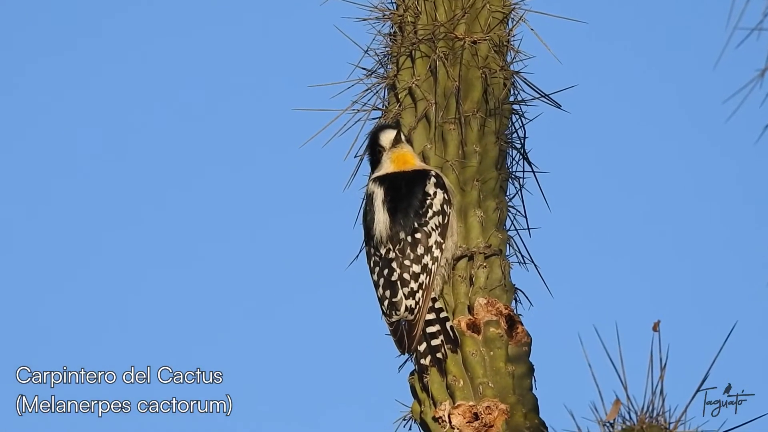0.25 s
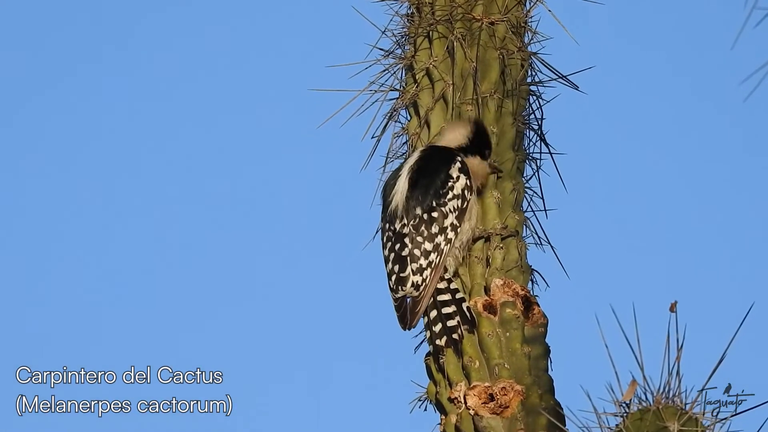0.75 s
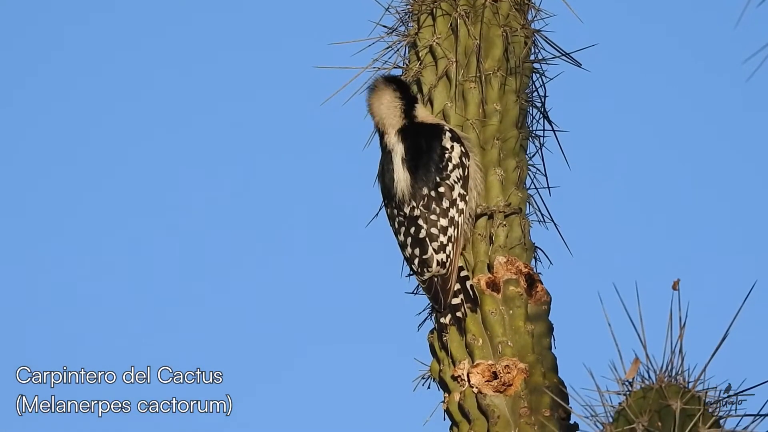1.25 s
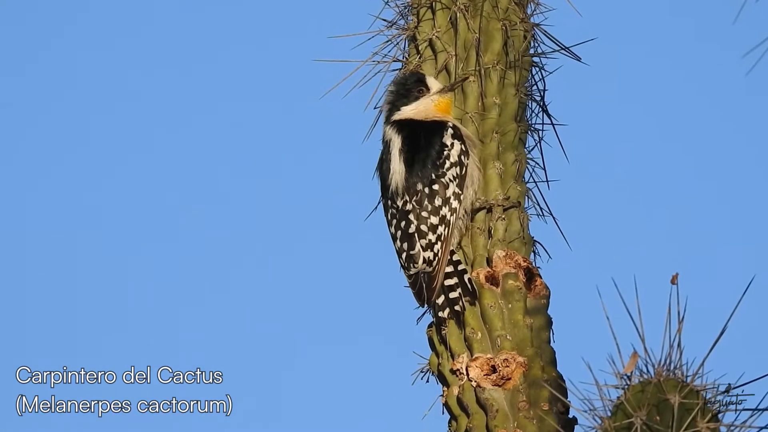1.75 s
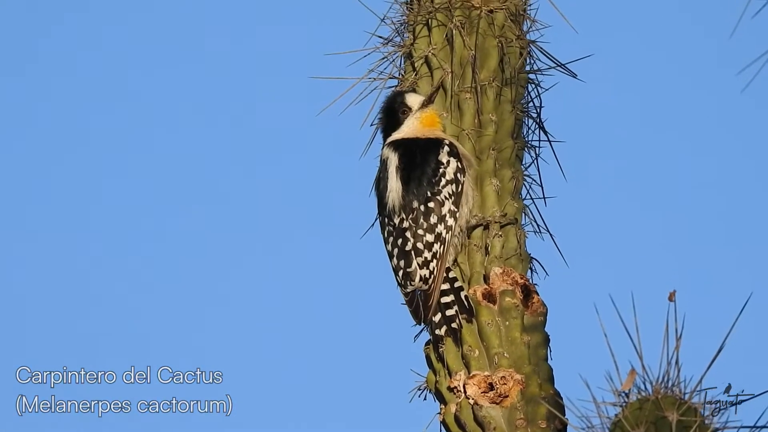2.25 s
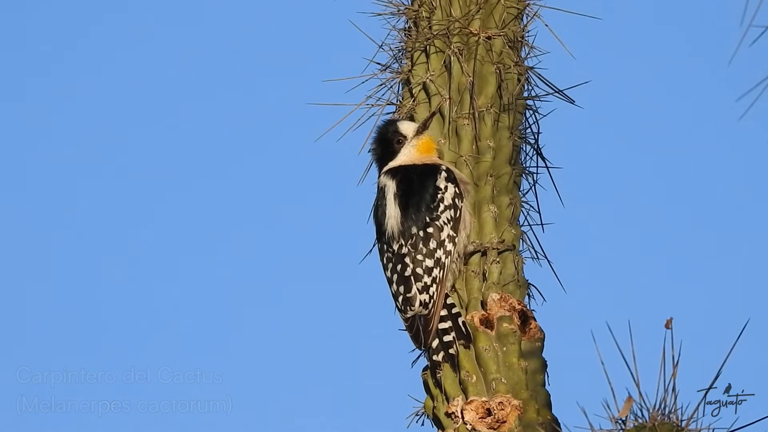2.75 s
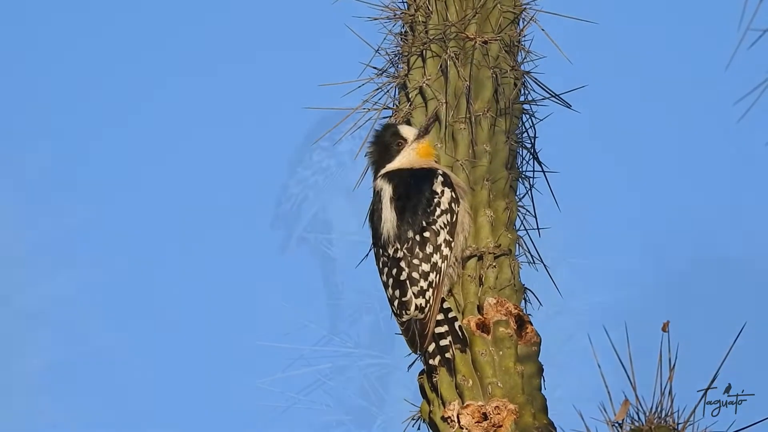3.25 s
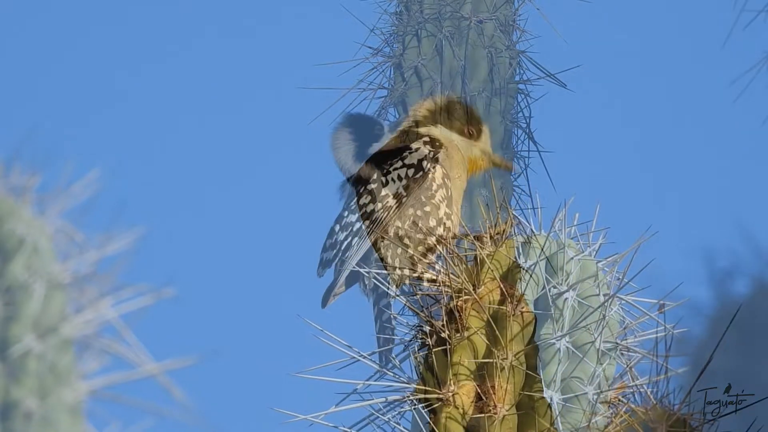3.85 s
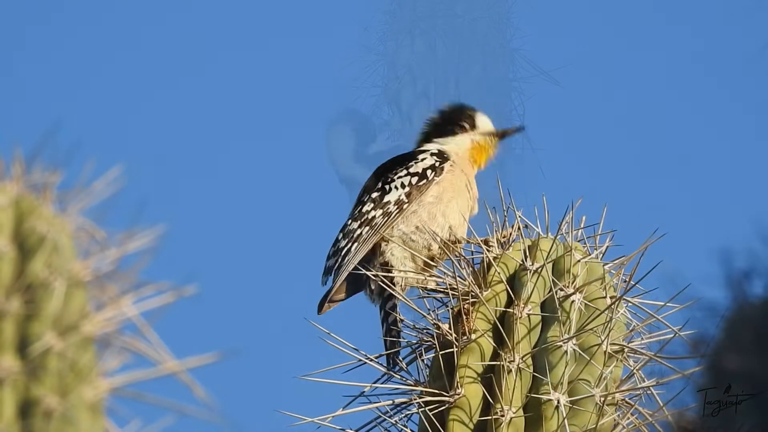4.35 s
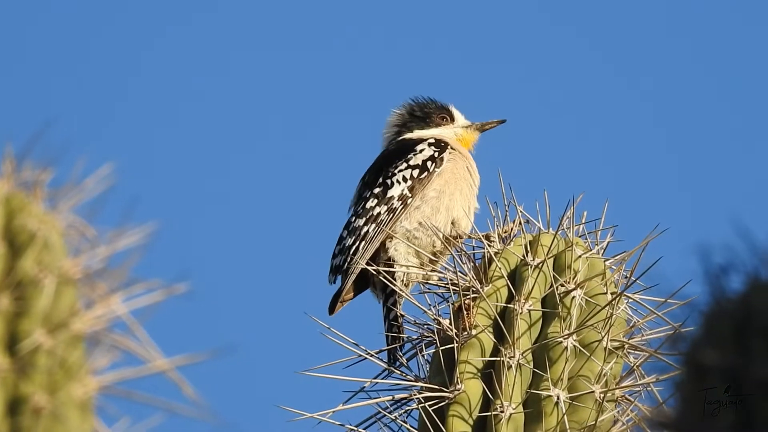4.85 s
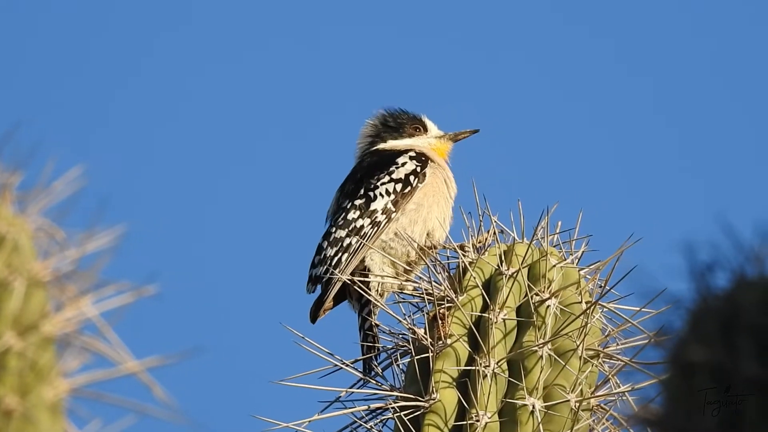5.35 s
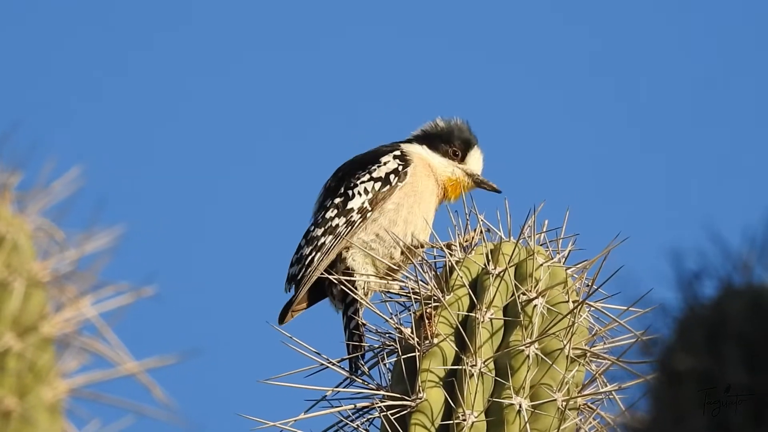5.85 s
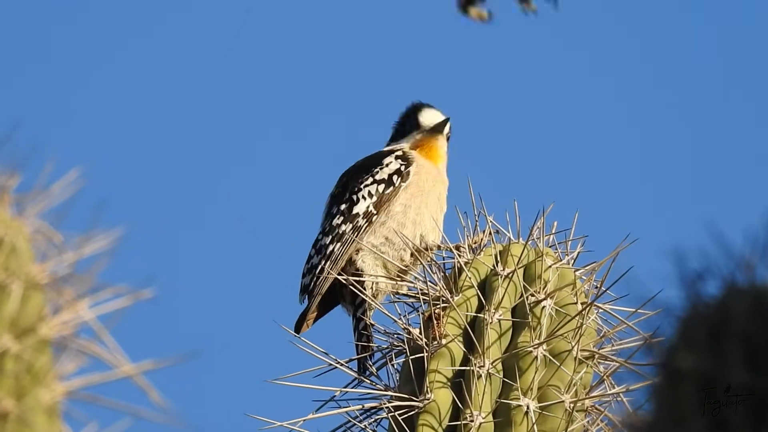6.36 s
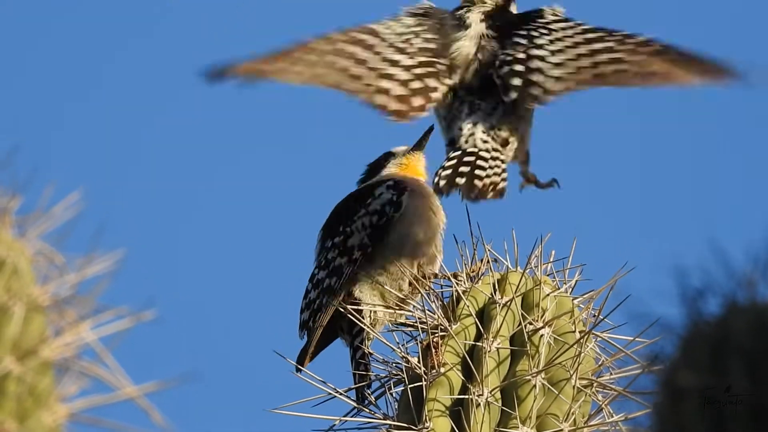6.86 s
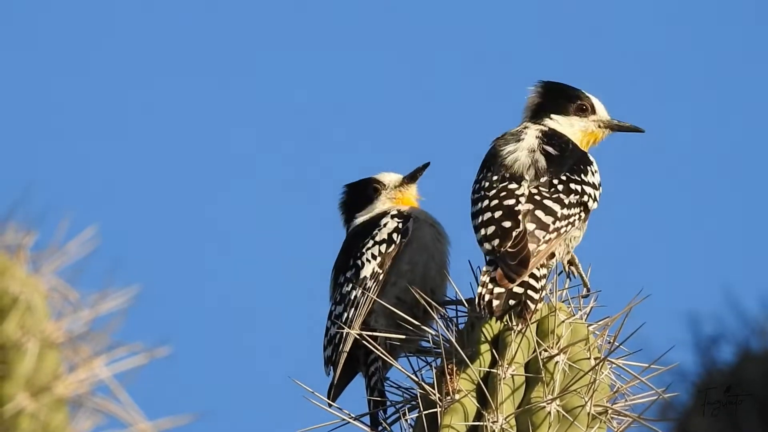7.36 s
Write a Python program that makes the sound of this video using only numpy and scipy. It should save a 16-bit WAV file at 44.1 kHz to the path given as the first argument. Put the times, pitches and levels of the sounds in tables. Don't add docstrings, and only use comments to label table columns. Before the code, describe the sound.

Woodpeckers chatter in sharp, falling, trembling calls outdoors; from about two and a half seconds a closer bird adds harsh, raspy squawks over faint hum.

```python
import sys
import numpy as np
from scipy import signal
from scipy.fft import rfft, irfft
from scipy.io import wavfile
from scipy.ndimage import uniform_filter1d

SR = 44100
rng = np.random.default_rng(int(sys.argv[2]) if len(sys.argv) > 2 else 0)


def volts_from_db(level):
    exponent = np.asarray(level, float) / 20
    return 10 ** exponent


def generate_wav(sig):
    pcm = np.round(np.clip(np.atleast_2d(sig).T, -1, 1) * 32767).astype(np.int16)
    wavfile.write(sys.argv[1], SR, pcm)


N = 336042


def evened(x):
    return x / np.sqrt(np.mean(x ** 2) + 1e-20)


def read(points, at):
    return np.interp(at, *np.transpose(points))


def colour(points, hz):
    f, db = np.transpose(points)
    return volts_from_db(np.interp(np.log(hz + 1), np.log(f + 1), db))


def ramp(t, start, length):
    return np.clip((t - start) / length, 0, 1)


def add(mix, start_s, sound):
    part = mix[max(round(start_s * SR), 0):][:len(sound)]
    part += sound[:len(part)]


def layer(calls):
    mix = np.zeros(N)
    for start_s, sound in calls:
        add(mix, start_s, sound)
    return mix


def wobble(n, hz):
    size = max(int(SR / hz), 2)
    noise = rng.standard_normal(n + 2 * size)
    smooth = uniform_filter1d(uniform_filter1d(noise, size), size)
    return evened(smooth)[size:size + n]


def voice(hz, gains, jitter, flutter, count):
    turns = np.cumsum(hz * (1 + jitter * wobble(len(hz), 900))) / SR + rng.random()
    tone = np.zeros(len(hz))
    for k in range(1, count + 1):
        audible = k * hz < SR / 2.5
        fluttering = 1 + flutter * wobble(len(hz), 350)
        tone += gains(k, k * hz) * audible * fluttering * np.sin(2 * np.pi * k * turns)
    return tone


def played(rows):
    s, hz, db = np.transpose(rows)
    t = np.arange(s[0], s[-1], 1 / SR)
    gain = np.sqrt(2) * volts_from_db(np.interp(t, s, db)) * signal.windows.tukey(len(t), .06)
    return s[0], np.interp(t, s, hz), gain


def scrub(x, t60, level_db):
    at = np.arange(150, SR // 2, 22)
    taps = np.zeros(SR // 2 + 22)
    signs = rng.choice([-1., 1.], len(at))
    taps[at + rng.integers(0, 22, len(at))] = signs * volts_from_db(-60 * at / SR / t60)
    return x + volts_from_db(level_db) * signal.fftconvolve(x, taps / np.linalg.norm(taps))[:len(x)]


# pitch_hz, level_db
HISS = [(1500, -30), (3000, -1), (5500, -4), (9000, -16.5), (15000, -40)]


def hiss(n, dull_db):
    hz = np.fft.rfftfreq(n, 1 / SR)
    spectrum = rfft(rng.standard_normal(n)) * colour(HISS, hz) * volts_from_db(dull_db * hz / 1000)
    return evened(irfft(spectrum, n))


# after_snap_s, pitch_hz
SQUAWK_FALL = [(-.004, 2200), (0, 2010), (.004, 1900), (.0162, 1800), (.0178, 1710), (.0265, 1490),
               (.0285, 1400), (.04, 1120)]
# after_snap_s, level_db
SQUAWK_EFFORT = [(0, -5), (.003, -.5), (.014, -2), (.017, -10), (.0195, -3), (.024, -6), (.0275, -19),
                 (.0305, -9), (.036, -13), (.04, -36)]
STEP_PARTIALS_DB = [(-6.5, 1.4, 0, -2.5, 0.5, 1, -13, -1), (-3, 2, -7.5, -4.5, 0, 0, -3, -12),
                    (-8.5, 1.5, 1.5, -2, -8, 3, -7, -14)]
# pitch_hz, level_db
BEAK = [(900, -16), (1500, -5.5), (2300, -10.5), (3100, -1), (3800, -1.5), (4600, 0.5), (5400, -6),
        (7500, -21), (10000, -30), (15000, -118)]
# pitch_hz, level_db
BROKEN_THROAT = [(1500, -86), (2300, -14), (3100, -12.5), (3850, 6), (4600, -22), (5400, -15),
                 (6200, -18.5), (9500, -36.5)]
USUAL_SLIP_S = .017


def squawk(snap, db, lead, pitch, slip, broken):
    t = np.arange(-lead, slip + SQUAWK_FALL[-1][0] - USUAL_SLIP_S, 1 / SR)
    until_slip = np.where(t < slip, t * USUAL_SLIP_S / slip, t - slip + USUAL_SLIP_S)
    u = np.where(t < 0, t, until_slip)
    opened = ramp(t, -.004, .004)
    clear = opened * ramp(t, slip - .00041, .00041) if broken else opened
    tune, climb, ring = rng.uniform([.985, -.4, -.01], [1.03, .9, .07])
    rasp = hiss(len(t), -0.98) * (1 + 0.5 * wobble(len(t), 214))

    dip = .14 * (not broken) * ramp(t, -.01, .01)
    held_hz = 2341 * tune * (1 + climb * (t + lead / 2) - dip)
    held = voice(held_hz, lambda k, hz: volts_from_db(-15.0 * (k - 1)), .015, .3, count=4)
    mutter = voice(rng.uniform(3700, 4400) + 0 * t, lambda k, hz: 1, .035, .7, count=1)
    swell = (1 - opened) * ramp(t, -lead, .008) * volts_from_db(200 * t - 2.5)
    chirp = np.sin(2 * np.pi * np.cumsum(3000 + 40000 * (t + .005)) / SR)
    crack = (.7 if broken else .35) * np.exp(-((t + .005) / .0025) ** 2) * chirp
    lead_in = swell * (held + volts_from_db(-8.5) * rasp + volts_from_db(-8.5) * mutter) + crack
    lead_db = -6.5 - (1 - 0.031) * np.clip(db + 28.5, -4, 4)

    closing = 0.963 + 0.23 * ramp(t, 0, slip) ** 2
    slow_hz = 756.4 * (1 + ring / 4 - .6 * t)
    slow = voice(slow_hz, lambda k, hz: colour(BROKEN_THROAT, hz * closing), .009, .18, count=13)
    burst_db = -1.0 - 9 * np.clip(-t / .002, 0, 1) - 3 * ramp(t, .012, .0034)
    pulsing = volts_from_db(burst_db) * slow + volts_from_db(-17.5) * rasp

    turned_db = STEP_PARTIALS_DB + rng.uniform(-2.5, 2.5, (3, 8)) - broken * 1.6 * np.arange(8)

    def beak_gain(k, hz):
        step_db = np.interp(u, [.016, .018, .0265, .0285], turned_db[[0, 1, 1, 2], k - 1])
        return colour(BEAK, hz) * volts_from_db(step_db)

    fall = voice(pitch * read(SQUAWK_FALL, u), beak_gain, .007, .2, count=8)
    body = (opened - clear) * pulsing + clear * (fall + volts_from_db(-20.0) * rasp)
    return snap - lead, volts_from_db(db) * (volts_from_db(lead_db) * lead_in + volts_from_db(read(SQUAWK_EFFORT, u)) * body)


# snap_s, level_db, lead_in_s, pitch_factor, broken_hold_s
CRACKED_SQUAWKS = [(2.487, -28.5, 0.045, 0.94, 0.016), (2.626, -29.5, 0.039, 0.92, 0.02),
                   (2.776, -28.5, 0.044, 0.97, 0.014), (2.8942, -29, 0.038, 0.96, 0.022),
                   (3.2763, -29, 0.041, 0.96, 0.017), (3.896, -29.5, 0.042, 0.93, 0.02),
                   (4.13, -31, 0.047, 0.94, 0.014), (5.798, -29.5, .04, 1.01, 0.016),
                   (6.5084, -29.5, 0.043, 0.96, 0.018), (6.819, -28.5, 0.048, 0.95, 0.012),
                   (7.5906, -30, 0.04, 0.94, 0.016)]
# snap_s, level_db, lead_in_s, pitch_factor, first_slip_s
CLEAR_SQUAWKS = [(3.0406, -30.5, 0.037, 1.01, 0.015), (3.4115, -30.5, 0.039, 0.93, 0.019),
                 (3.768, -28.5, 0.039, 0.98, 0.018), (4.2524, -30, 0.044, 1, 0.019),
                 (4.387, -31, 0.035, 0.98, 0.017), (4.721, -28.5, 0.035, 0.96, 0.017),
                 (4.8762, -30.5, 0.037, 0.94, .017), (5.149, -37, 0.012, 0.87, 0.017),
                 (5.333, -37.5, 0.031, .86, .015), (5.5253, -30, 0.044, 0.91, 0.018),
                 (6.6652, -29.5, 0.049, 0.93, 0.018), (7.1717, -28.5, 0.042, 0.95, 0.013)]


def near_squawks():
    cracked = layer(squawk(*row, broken=True) for row in CRACKED_SQUAWKS)
    return cracked + layer(squawk(*row, broken=False) for row in CLEAR_SQUAWKS)


ANSWER_DROP = [(0, 1.03), (.12, 0.98), (.22, 0.93), (.4, .86), (1, 0.83)]
# share_of_note, level_db
ANSWER_EFFORT = [(0, -3.5), (.05, -1.5), (.11, -2), (.14, -4), (.4, -12), (.85, -16), (1, -19)]


def answer(s, db, hz, length, depth, first_db):
    share = np.linspace(0, 1, round(length * SR))
    partial_db = [first_db + 5.6 * share - 0.25 * (db + 38), -4.0 * share]
    partial_db += [top_db - 1.7 * share for top_db in (-23.0, -29.0, -35.5, -35)]
    grain = np.clip(share / 0.21, 0, 1)

    def grainy(k, f):
        return volts_from_db(partial_db[k - 1]) * (1 + .55 * grain * min(k - .35, 1) * wobble(len(f), 350))

    pitch = hz / 2 * read(ANSWER_DROP, share) ** depth
    tone = voice(pitch, grainy, .004 + .012 * grain, .1, count=6)
    tone += volts_from_db(-20.5) * hiss(len(share), .1)
    return s, volts_from_db(db + read(ANSWER_EFFORT, share)) * tone * np.clip(share / .018, 0, 1) ** 2


# start_s, level_db, second_partial_hz, length_s
ANSWERS = [(.0, -36, 4725, 0.048), (0.174, -35, 4686, 0.083), (0.357, -35, 4890, 0.083),
           (0.562, -39, 4790, 0.078), (0.74, -36.5, 4857, 0.074), (0.9412, -36, 4920, 0.073),
           (1.1083, -34.5, 5120, 0.069), (1.2706, -34.5, 4980, 0.087), (1.456, -35.5, 4817, 0.099),
           (1.642, -37.5, 4970, 0.09), (1.885, -38, 4960, 0.053), (2.0105, -34, 4910, 0.073),
           (2.191, -37, 4890, 0.056), (2.358, -38, 4890, 0.066), (4.207, -38, 4860, 0.092),
           (4.541, -35, 4940, 0.07), (4.694, -35.5, 4787, 0.08), (4.826, -34.5, 4920, 0.072),
           (4.978, -35.5, 4905, 0.078), (5.134, -35, 4980, 0.093), (5.2942, -33.5, 4860, 0.048),
           (5.472, -38.5, 4603, 0.13), (5.642, -35.5, 4750, 0.1), (5.819, -35, 4930, 0.086),
           (6.077, -40, 4980, 0.077), (6.223, -41.5, 4670, 0.084), (6.373, -41.5, 4910, 0.066),
           (7.0934, -37.5, 4860, 0.096), (7.289, -37, 4848, 0.061), (7.469, -38, 4816, 0.091)]
# start_s, level_db, second_partial_hz, length_s, fall_depth
CUT_INS = [(1.017, -44.5, 5580, .08, 2.4), (1.198, -41, 4990, .085, 1.1), (1.338, -43.5, 4930, 0.13, 0.97),
           (1.61, -43, 4870, 0.1, 1.14), (1.739, -42.5, 4790, .07, .6), (1.839, -39, 4670, 0.081, 0.94),
           (2.151, -44, 5200, .06, 1.3), (2.523, -40, 5040, 0.1, 0.98), (2.735, -41.5, 5240, 0.069, 0.46),
           (5.943, -44, 4625, 0.06, 1.03)]


def answering_mates():
    steady = layer(answer(*row, 1.0, first_db=-9.5) for row in ANSWERS)
    return steady + layer(answer(*row, first_db=-8.5) for row in CUT_INS)


# after_start_s, pitch_hz
ARCH = [(0, 3008), (.015, 3600), (.034, 4040), (.054, 3930), (.068, 2970)]


def arch(s, db, held_db):
    t = np.arange(0, .095, 1 / SR)
    bow = voice(read(ARCH, t), lambda k, hz: volts_from_db(-2 - 7 * np.clip(1 - t / .03, 0, 1)), .006, .45, count=1)
    bow *= np.clip((ARCH[-1][0] - t) / .006, 0, 1)
    held_partials_db = [-5, -5.0, -11.0, -17.5]
    held = voice(1990 - 600 * t, lambda k, hz: volts_from_db(held_partials_db[k - 1]), .0062, .94, count=4)
    held *= ramp(t, .012, .0027) * volts_from_db(-12.0 * ramp(t, .058, .008))
    return s, volts_from_db(db) * (bow + volts_from_db(held_db) * held) * signal.windows.tukey(len(t), .15)


# start_s, level_db, held_note_db
ARCHES = [(0.0146, -45.5, -10), (0.377, -45.5, -11), (0.673, -49.5, -6), (1.057, -46, -9),
          (1.344, -43, -15), (1.7601, -46, -10), (2.174, -46, -8.5), (2.8, -47, -9.5), (3.099, -47.5, -13),
          (3.827, -46, -11), (4.1496, -46.5, -12), (4.485, -49, -5), (5.1112, -47, -5),
          (5.5781, -45.5, -11), (5.9412, -46, -10)]


def far_arches():
    return layer(arch(*row) for row in ARCHES)


def whistle(rows, overtone_db, jitter, tiring=0):
    s, hz, gain = played(rows)
    push = gain / gain.max()
    gain = gain * volts_from_db(250 * tiring * wobble(len(hz), 120))
    trembling = jitter + tiring * np.linspace(0, 1, len(hz)) ** .5

    def pushed(k, f):
        return volts_from_db(overtone_db[k - 1]) * push ** (0.98 * min(k - 1, 1))

    return s, gain * voice(hz, pushed, trembling, 0.33, count=len(overtone_db))


def sagging(s, length, db):
    t = np.linspace(0, length, num=60)
    scoop_hz = 1068 * np.exp(-t / 0.00648)
    hz = 5630 - 2200 * t + 514 * np.exp(-(t / .06) ** 2) - scoop_hz
    return np.transpose([s + t, hz, db - 6.5 * (1 - np.exp(-t / 0.047)) - 24 * t])


# start_s, length_s, level_db
WHISTLES = [
    (3.187, 0.436, -40.5),
    (6.359, 0.51, -38),
]


def sagging_whistles():
    return layer(whistle(sagging(*row), [0, -29], .004, tiring=.016) for row in WHISTLES)


def piping(s, length, first_hz, last_hz, db):
    return [(s, first_hz, db), (s + length, last_hz, db - 1)]


# start_s, length_s, first_hz, last_hz,
# level_db
PIPINGS = [(0.255, 0.097, 6400, 6400, -70), (0.258, 0.088, 8870, 8900, -73),
           (0.319, 0.037, 2340, 3220, -51.5), (1.365, 0.043, 5880, 5890, -62), (6.25, .03, 5950, 5920, -66),
           (6.94, .055, 5420, 5560, -59), (.082, 0.014, 3980, 4040, -47), (1.108, 0.045, 7760, 7700, -76),
           (2.043, 0.14, 3220, 2612, -72), (2.289, 0.16, 1840, 1836, -60.5),
           (3.123, 0.049, 5770, 5750, -61), (3.188, 0.061, 9900, 9500, -74),
           (3.444, 0.051, 2070, 1650, -68), (3.503, 0.11, 1604, 1400, -67), (3.474, 0.11, 3370, 2750, -70),
           (6.894, 0.028, 8400, 8300, -66), (3.597, 0.32, 1377, 1410, -73), (4.007, 0.091, 2076, 1850, -61),
           (4.013, 0.039, 5880, 5860, -61.5), (4.16, 0.033, 8130, 8100, -70), (4.25, 0.02, 876, 876, -67),
           (0.513, 0.042, 3640, 3760, -53), (0.68, 0.031, 1880, 2064, -68),
           (3.508, 0.018, 7130, 7040, -65.5), (4.247, 0.24, 4960, 4390, -54.5),
           (4.993, 0.069, 5530, 5340, -55.5), (5.015, 0.11, 2045, 1985, -64),
           (5.228, 0.014, 3050, 3500, -48.5), (6.373, 0.07, 9940, 9340, -73),
           (6.826, 0.11, 5180, 5520, -47.5), (6.988, 0.066, 5760, 5550, -70),
           (3.227, 0.011, 5900, 5800, -43), (1.778, 0.055, 5814, 5500, -64),
           (6.899, 0.091, 2070, 1925, -61.5)]


def middle_pipings():
    return layer(whistle(piping(*row), [0], .01) for row in PIPINGS)


# time_s, pitch_hz, level_db
SONG = [
    [(0, 1340, -43.5), (.022, 1296, -47.5), (.028, 1130, -59), (.045, 1137, -49), (.075, 1460, -71)],
    [(.147, 3080, -42), (.17, 2583, -36.5), (.21, 2130, -39), (.217, 1810, -42.5), (.224, 1290, -47),
     (.26, 1286, -47), (.311, 1283, -49), (.315, 1770, -38), (.322, 2300, -73)],
    [(.345, 1760, -43), (.349, 1326, -46.5), (.372, 1337, -49.5), (.378, 1126, -63), (.395, 1206, -53),
     (.42, 1370, -66)],
]


def songbird():
    clear = layer(whistle(rows, [0, -34], 0.014) for rows in SONG)
    overtones_db = [-60, -62, -18.0, -32, -25.0, -39, -27.0]
    shrill = layer(whistle(rows, overtones_db, 0.022) for rows in SONG)
    air_loss = signal.butter(4, 9500, fs=SR, output="sos")
    return clear, signal.sosfilt(air_loss, shrill)


# pitch_hz, level_db
NOSE = [(1500, -34), (2800, -9.5), (3300, -25), (4300, 2), (5100, -12), (5600, -11), (7400, -12),
        (9000, -41)]


def mew(rows, jitter, dull_db, air_db):
    s, hz, gain = played(rows)

    def nasal(k, f):
        return colour(NOSE, f) * volts_from_db(dull_db * k + 3.5 * wobble(len(hz), 25))

    pulses = evened(voice(hz, nasal, jitter, .4, count=18))
    return s, gain * (pulses + volts_from_db(air_db) * hiss(len(hz), 0.81))


# time_s, pulse_rate_hz, level_db
MEWS = [
    [(6.87, 426, -56), (6.93, 452, -57), (7.0, 471, -54), (7.06, 466.6, -55), (7.11, 435.5, -59)],
    [(.49, 555, -67), (.52, 617, -61), (.56, 602, -60), (.6, 622, -65), (.65, 605, -60)],
]


def mews():
    low, high = MEWS
    fifth = [(s, 5 * hz, db + 1.5) for s, hz, db in high]
    return layer([mew(low, .004, -.3, -12), mew(high, .0018, -1.1, -11), whistle(fifth, [0], .003)])


# loudest_s, level_db, half_length_s
CHORUS = [(0.08, -51.5, 0.2), (0.424, -50.5, 0.12), (0.668, -46.5, 0.16), (1.227, -51, 0.24),
          (1.84, -61, 0.15), (2.328, -61.5, 0.73), (3.35, -57.5, 0.38), (4.16, -52.5, 0.13),
          (4.397, -44, 0.11), (4.908, -50.5, 0.24), (5.12, -59, 0.12), (5.483, -51, 0.24),
          (6.019, -48, 0.18), (6.62, -56.5, 0.41), (6.995, -63, 0.19), (7.458, -52, 0.14),
          (7.62, -47, 0.17)]


def chorus():
    t = np.arange(N) / SR
    out = np.zeros(N + SR // 2)
    share, count = np.linspace(0, 1, 2400), 540
    for bird, (late, off, glide, size) in enumerate(rng.random((count, 4))):
        start_s = (bird + late) / count * len(out) / SR
        place = (bird * (np.sqrt(5) - 1) / 2) % 1 + off - 1
        bend = 1 + 0.0404 * np.sin(np.pi * share) + (.07 - 0.2 * glide) * share
        hz = 4635 * (1 + .3 * place) * bend
        note = voice(hz, lambda k, f: 1, .02, .6, count=1)
        add(out, start_s, volts_from_db(-6 * size) * np.sin(np.pi * share) * note)
    out = scrub(out, 0.46, 3.2)[-N:]
    out /= np.sqrt(uniform_filter1d(out ** 2, 6000) + 1e-12)
    outbursts = sum(volts_from_db(db) * np.exp(-2 * ((t - s) / half) ** 2) for s, db, half in CHORUS)
    return out * (volts_from_db(-100) + outbursts)


# time_s, level_db
ENGINE_LEVEL = [(0.0, -65.5), (0.21, -62.5), (0.8, -65), (2.23, -61.5), (2.42, -58.5), (3.56, -59),
                (4.22, -61.5), (5.35, -61.5), (6.22, -63.5), (7.56, -62.5), (7.62, -66)]
# multiple_of_firing_rate, level_db
FIRING_ORDERS = [(1, -18), (2, -37), (3, -38), (4, -17), (5, -1), (6, 2), (7, -6), (8, -16), (9, -20.5),
                 (10, -50), (11, -29), (12, -23.5), (13, -16), (14, -17), (15, -27)]
# time_s, firing_rate_hz
ENGINE_SPEED = [(0, 24.0), (2.0, 24.3), (3.6, 25.0), (4.2, 25.6), (5.5, 26.1), (6.6, 26.6), (7.62, 26.8)]


def engine():
    t = np.arange(N) / SR
    coarse = t[::64]

    def drift(hz):
        return np.interp(t, coarse, wobble(len(coarse), 64 * hz))

    turns = np.cumsum(read(ENGINE_SPEED, t)) / SR + 0.036 * drift(2.92)
    hum = np.zeros(N)
    for k, db in FIRING_ORDERS:
        pipe_phase = np.arctan((k - 5.8) / 0.37)
        hum += volts_from_db(db + 0.92 * drift(3.4)) * np.cos(2 * np.pi * k * turns - pipe_phase)
    return evened(hum) * volts_from_db(read(ENGINE_LEVEL, t))


# pitch_hz, level_db (per Hz)
AIR_SPECTRUM = [(15, -34), (25, -16), (75, 3.5), (144, -8.5), (221, -2.5), (684, -12.5), (971, -6.5),
                (1620, -9.5), (2360, -9.5), (2630, -6), (3350, -13.5), (4500, -8), (6560, -14),
                (15500, -34.5)]
# time_s, level_db
AIR_SWELL = [(0, 4), (1.7, 2), (2.5, 4.5), (4, 4.5), (7.62, 1.5)]
# centre_s, half_length_s, level_db
WASH_DIPS = [(0.273, 0.0067, -12), (1.123, 0.0087, -20), (1.165, .008, -22), (4.28, 0.027, -11),
             (1.78, 0.016, -32), (1.91, 0.011, -23), (2.084, 0.012, -17)]


def air():
    frames, hz = N // 256 + 5, np.fft.rfftfreq(1024, 1 / SR)
    a, b, patches = rng.standard_normal((frames, 513, 3)).T
    patches = evened(uniform_filter1d(uniform_filter1d(patches, 10, 0), 12, 1))
    frame_s = np.arange(frames) * 256 / SR
    rumble_db = (hz < 100)[:, None] * 0.9 * (frame_s - 4)
    spectra = (a + 1j * b) * colour(AIR_SPECTRUM, hz)[:, None] * volts_from_db(2.17 * patches + rumble_db)
    wash = signal.istft(spectra, nperseg=1024, noverlap=768)[1][:N]
    t = np.arange(N) / SR
    dips_db = sum(db * np.exp(-((t - s) / half) ** 4) for s, half, db in WASH_DIPS)
    return evened(wash) * volts_from_db(-65.5 + read(AIR_SWELL, t) + dips_db)


def scene():
    song, shrill = songbird()
    birds = scrub(near_squawks() + song + mews(), 0.28, -13.5)
    birds = birds + scrub(answering_mates(), 0.21, -4.0)
    birds = birds + scrub(far_arches(), .2, -5)
    birds = birds + scrub(sagging_whistles(), 0.27, -3.0)
    birds = birds + scrub(middle_pipings(), 0.26, -2.15)
    birds = birds + scrub(shrill, 0.27, 3.2)
    return (birds + chorus() + engine() + air())[None]


def band_limit(x):
    return signal.sosfilt(signal.butter(12, 15660, fs=SR, output="sos"), x)


def record(dry):
    return band_limit(dry)


dry = scene()
out = record(dry)
generate_wav(out)
```